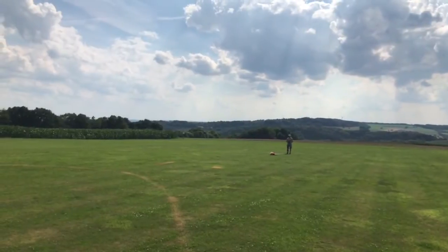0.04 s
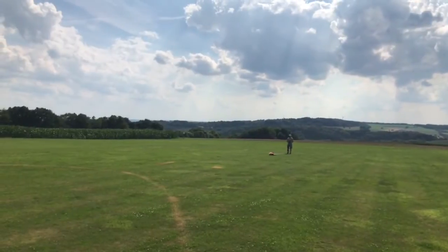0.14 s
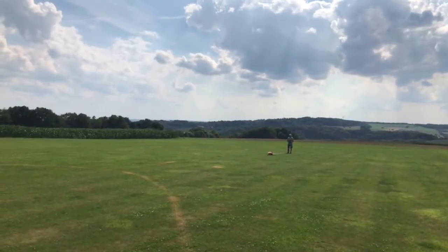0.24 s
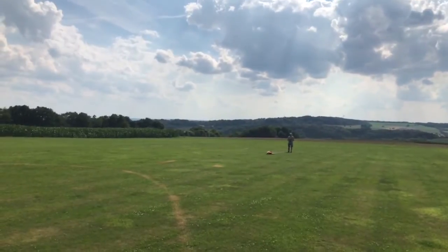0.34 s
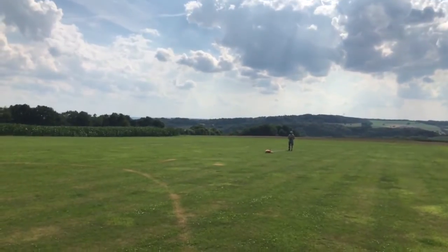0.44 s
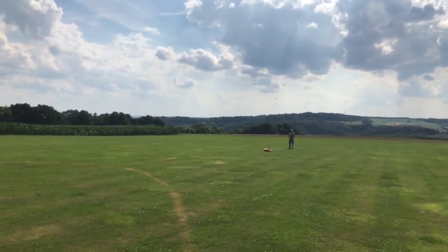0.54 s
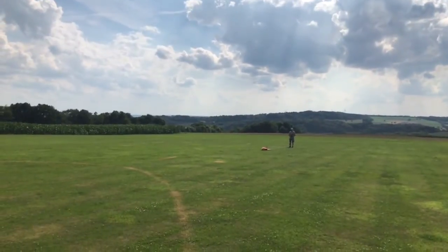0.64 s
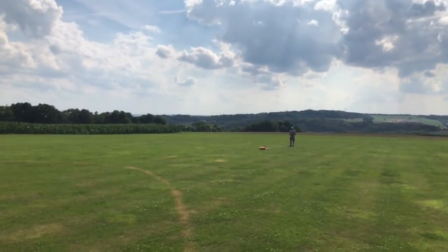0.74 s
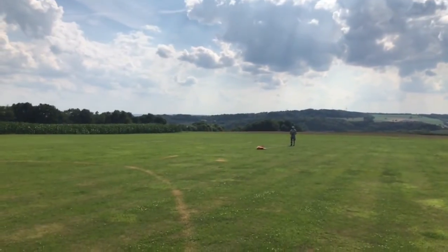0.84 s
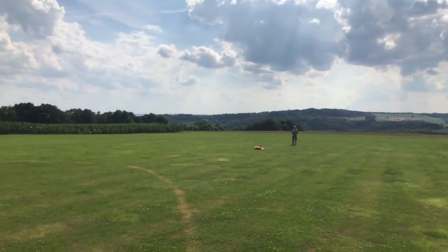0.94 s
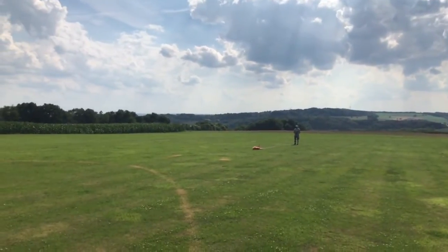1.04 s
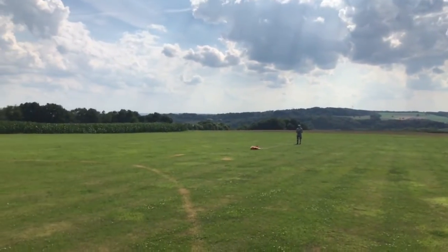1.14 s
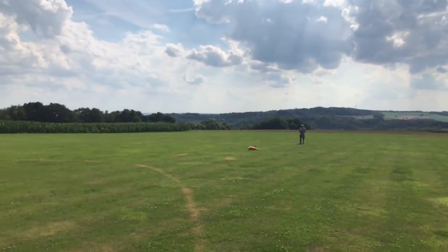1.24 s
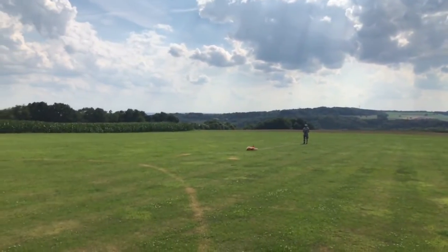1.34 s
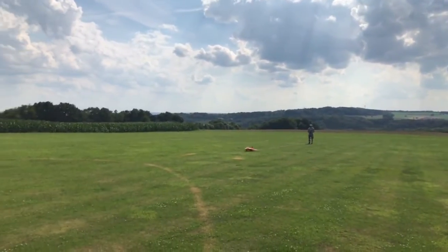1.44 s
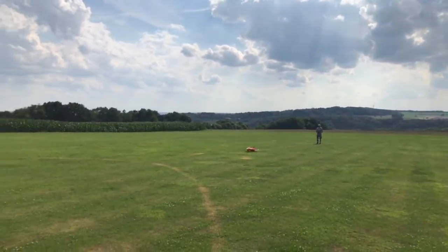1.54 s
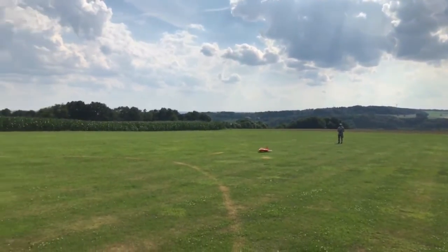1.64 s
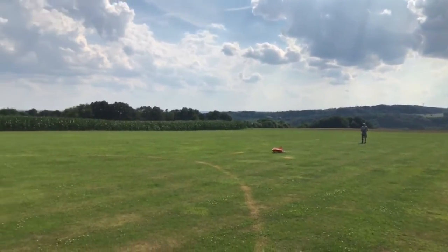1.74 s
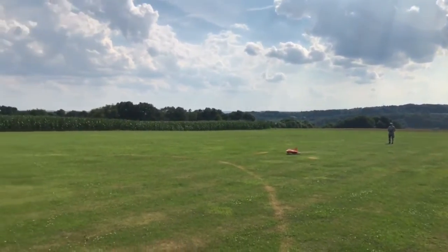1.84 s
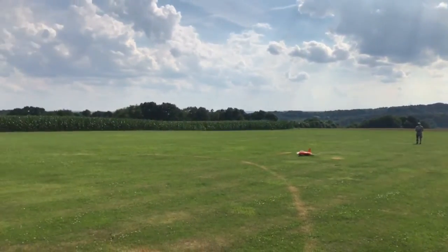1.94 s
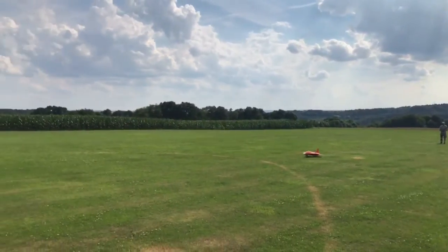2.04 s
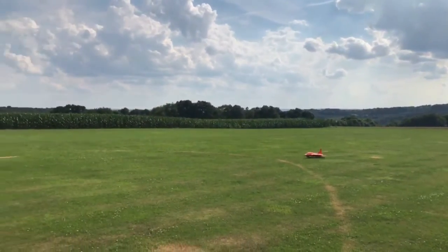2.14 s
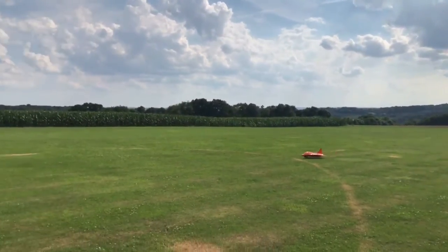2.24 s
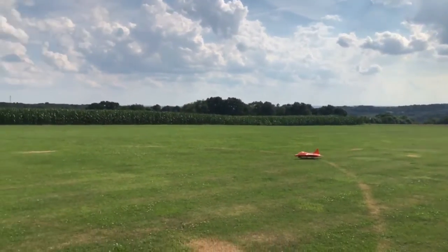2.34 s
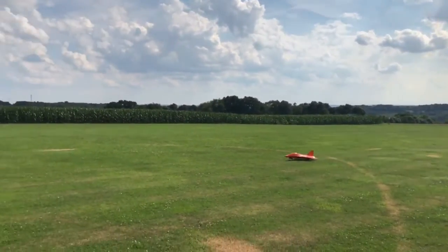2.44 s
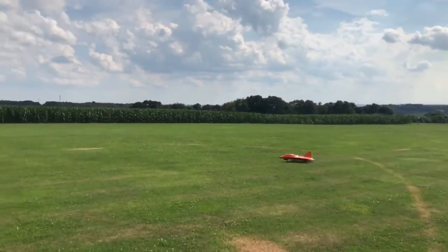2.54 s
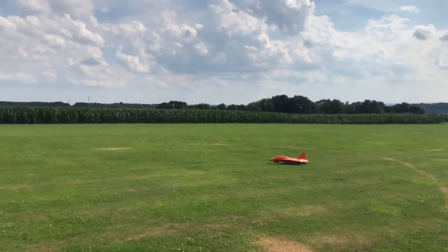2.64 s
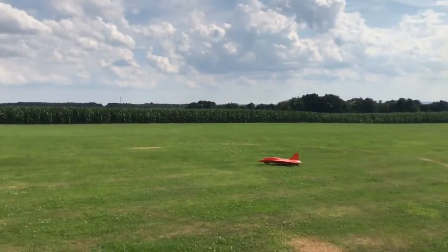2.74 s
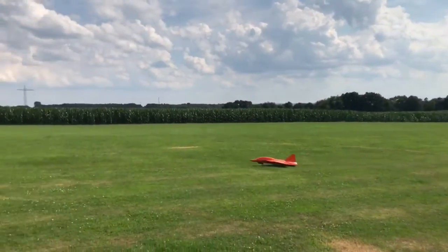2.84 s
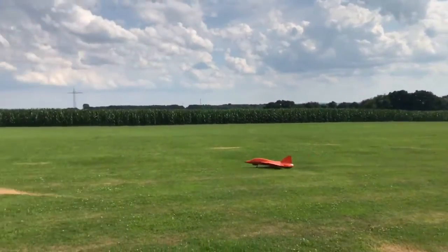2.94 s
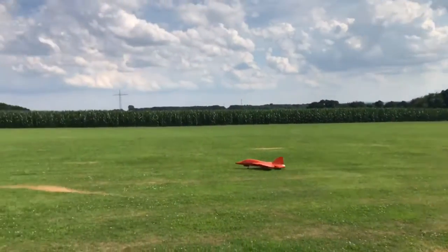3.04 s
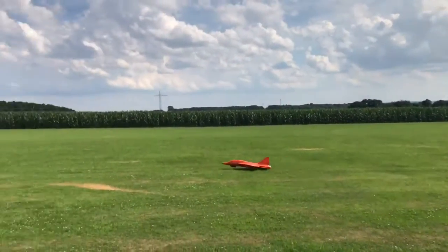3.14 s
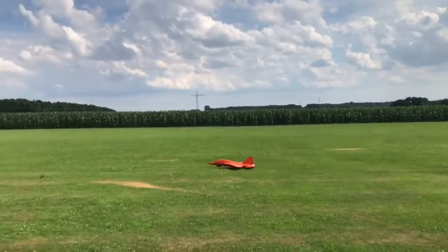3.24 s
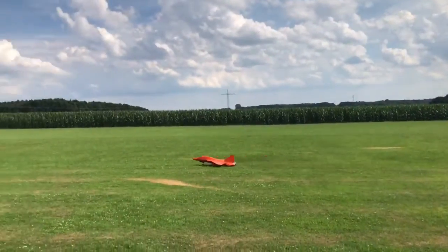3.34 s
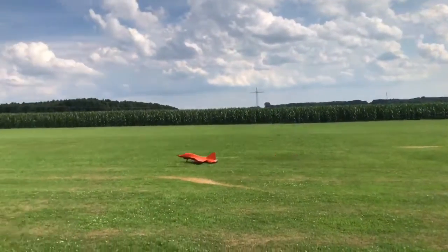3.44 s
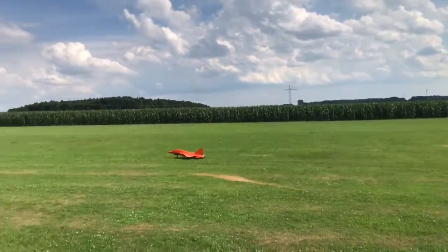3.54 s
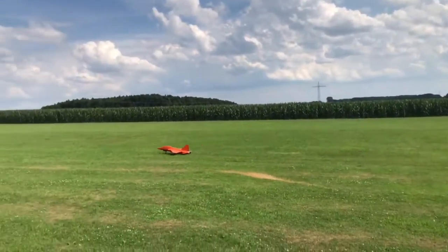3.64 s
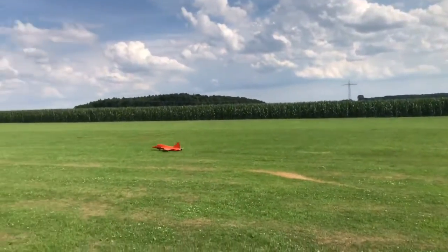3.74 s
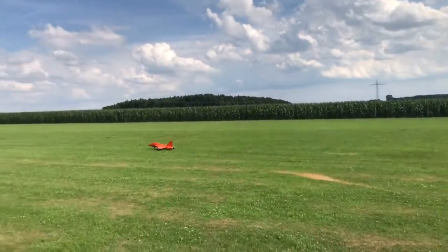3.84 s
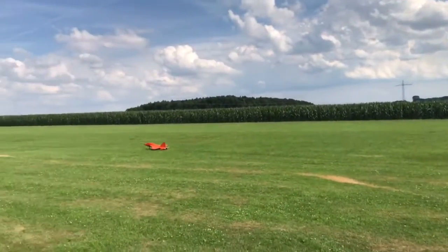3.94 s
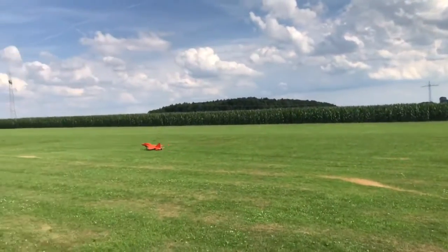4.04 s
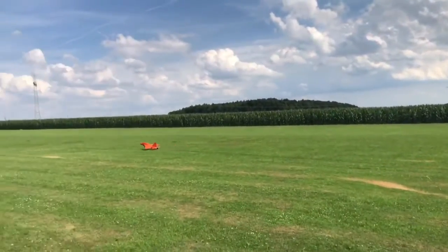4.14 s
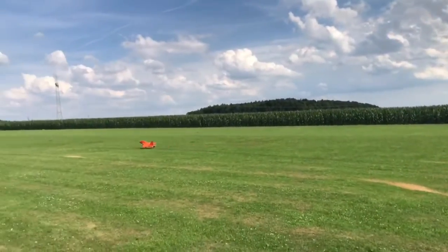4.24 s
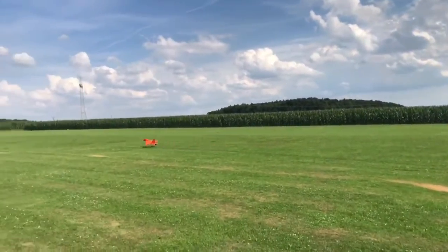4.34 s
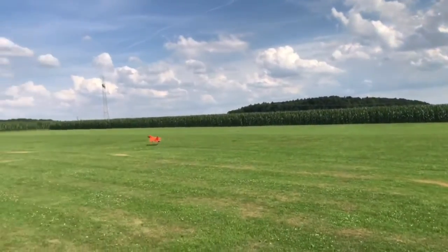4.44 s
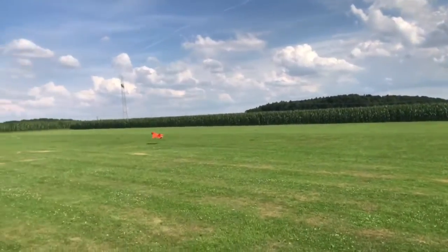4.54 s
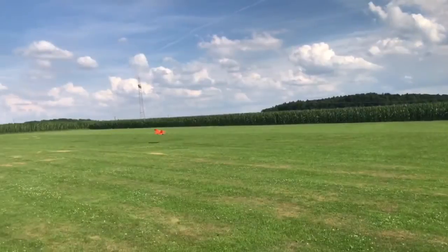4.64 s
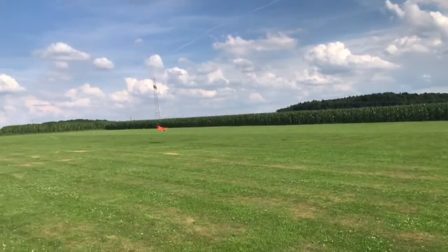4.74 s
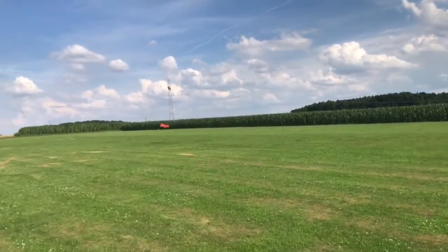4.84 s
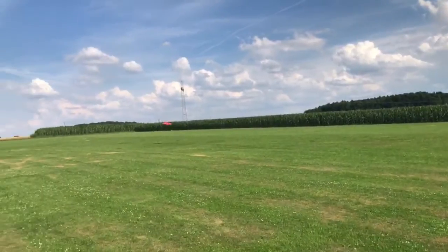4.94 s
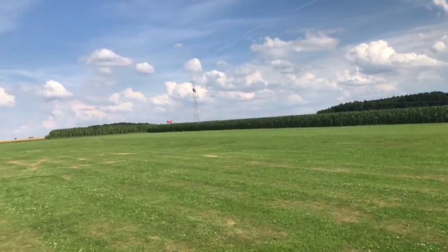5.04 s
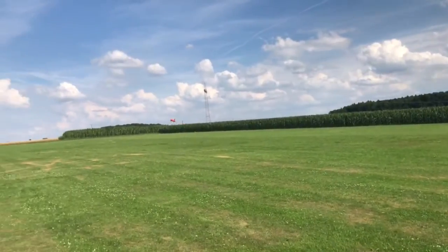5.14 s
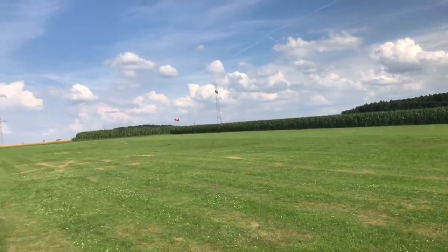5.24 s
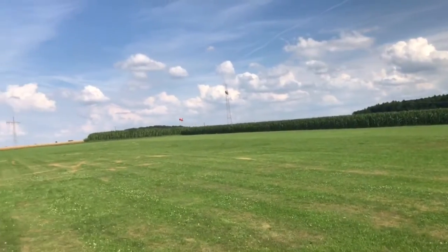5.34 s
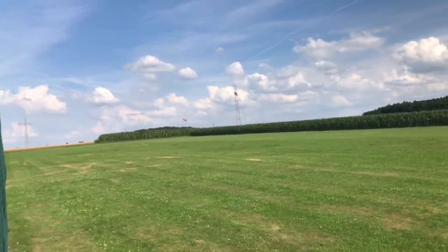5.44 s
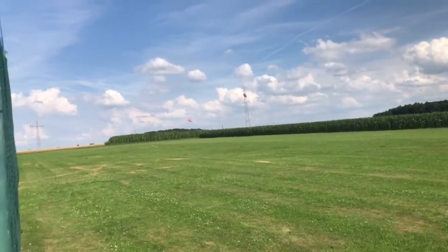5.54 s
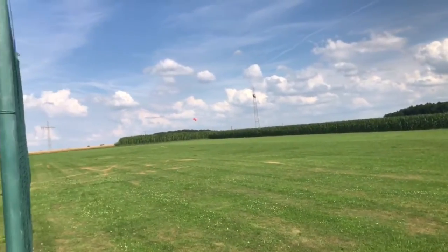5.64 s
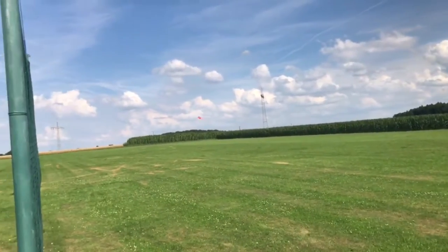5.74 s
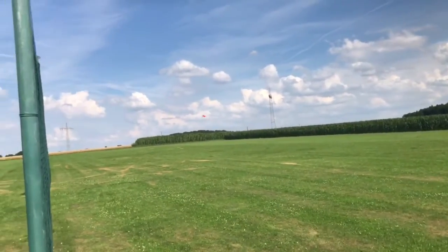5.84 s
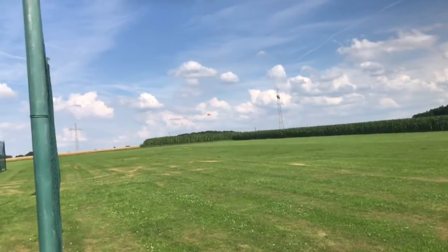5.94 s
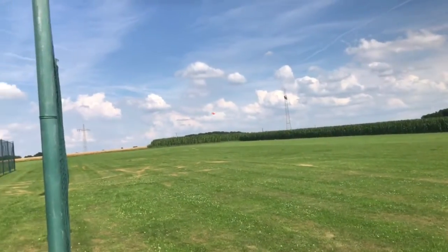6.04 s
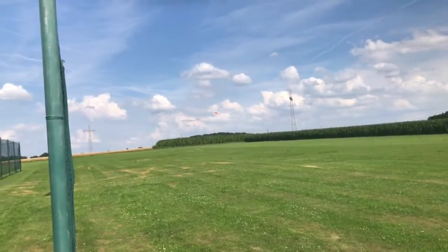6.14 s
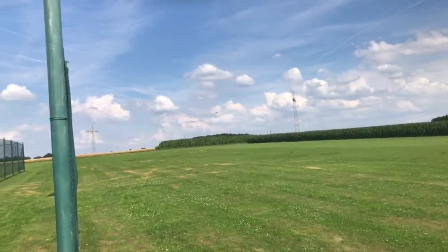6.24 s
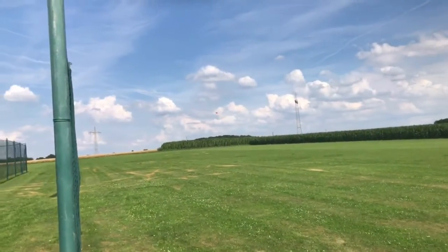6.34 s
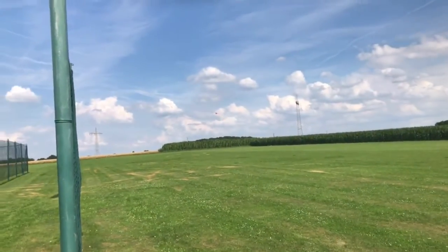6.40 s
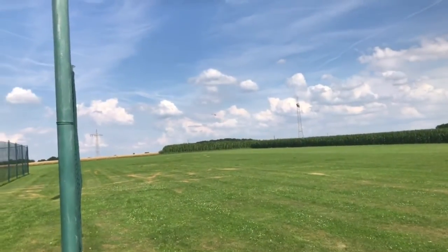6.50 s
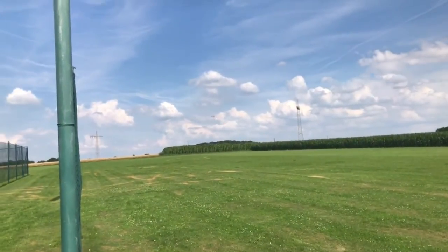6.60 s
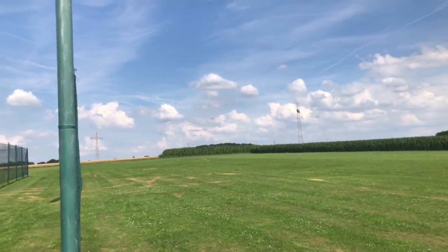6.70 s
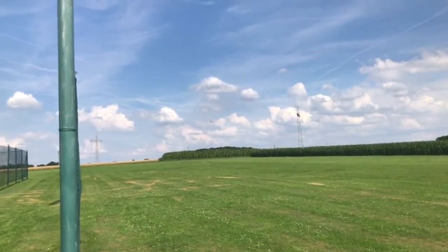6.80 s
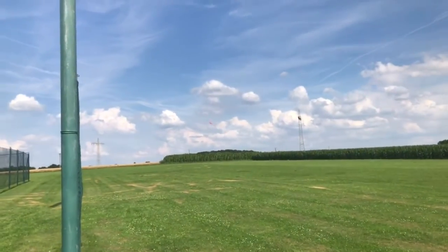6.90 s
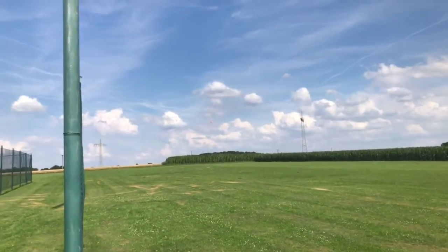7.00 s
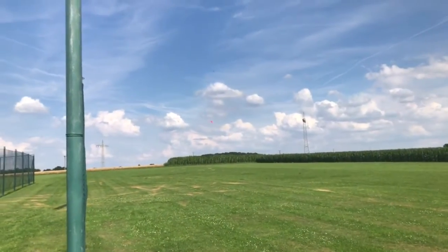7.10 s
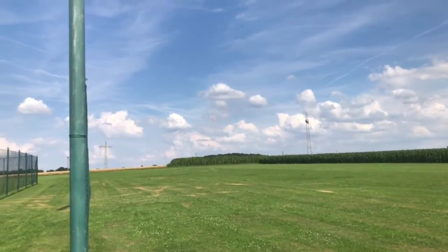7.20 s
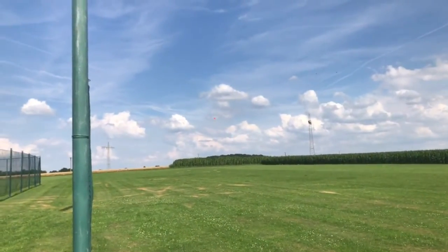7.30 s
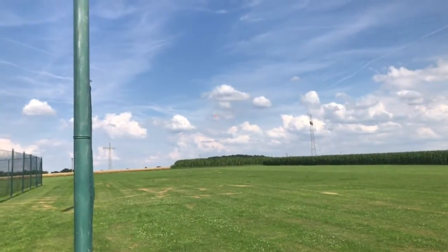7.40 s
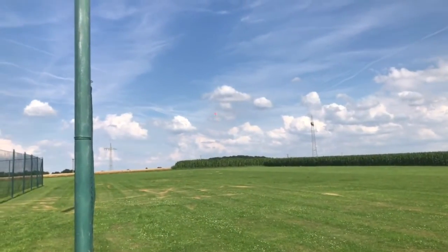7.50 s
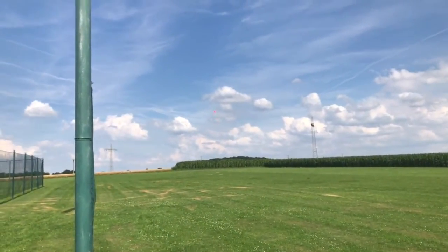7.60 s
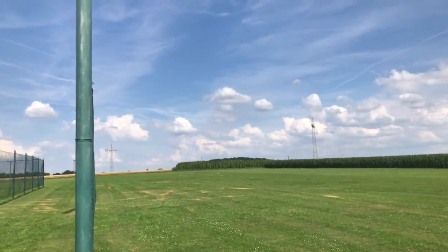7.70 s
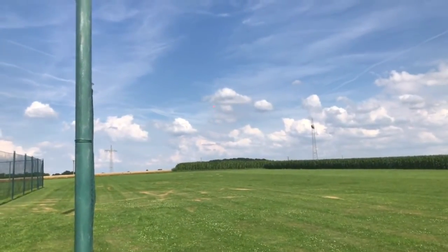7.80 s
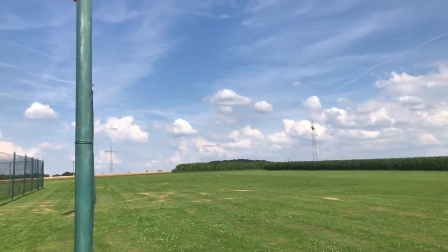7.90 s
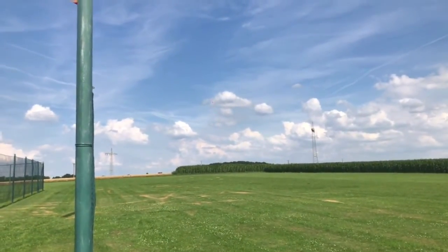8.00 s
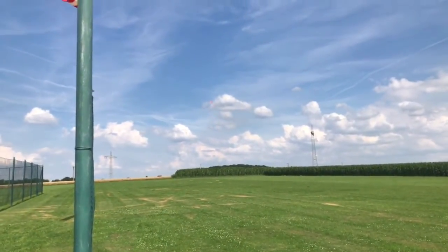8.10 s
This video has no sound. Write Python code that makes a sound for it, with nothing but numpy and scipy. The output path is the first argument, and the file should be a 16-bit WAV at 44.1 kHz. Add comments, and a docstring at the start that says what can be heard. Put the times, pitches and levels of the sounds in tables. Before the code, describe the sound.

In an open grass field, a distant model jet starts as thin hiss and a very high faint whine over low wind. It rushes closer, the whine turning piercing just before it passes, then dropping in pitch as a broad exhaust rush takes over. Heavy gusts thump and flutter against the single microphone during the pass, then ease as the jet climbs and fades.

```python
"""First a thin, distant hiss with a faint high whine over low wind; then a model jet with an electric ducted
fan rolls over grass at full power, passes the microphone and climbs away. The whine is a blade-passing tone
whose pitch falls by Doppler shift; the rush is noise whose colour turns from intake to exhaust, over a low roar.
In the climb a delayed ground echo sweeps a comb through rush and roar. Wind is noise driven by a table of gusts
over a breeze, with single pressure pulses as buffets, all at one microphone."""
import sys
import numpy as np
from scipy import signal
from scipy.fft import rfft, irfft
from scipy.io import wavfile
from scipy.ndimage import uniform_filter1d

SR = 44100
rng = np.random.default_rng(int(sys.argv[2]) if len(sys.argv) > 2 else 0)


def bounce(signal):
    """Save signal as a 16-bit WAV file at the path given by the first command-line argument."""
    frames = np.transpose(np.atleast_2d(signal))
    limited = np.clip(frames, -1, 1)
    pcm = np.round(limited * 32767).astype(np.int16)
    wavfile.write(sys.argv[1], SR, pcm)


N = 359856
TIME = np.arange(N) / SR  # s

# Levels are those at the source tables: small trims and the microphone's response come later.
# Blade tone, greatest as the intake points at the microphone: (time [s], tone level [dB], octave level [dB])
WHINE_LEVEL = [(0, -62, -79), (.6, -56.5, -73), (1.25, -54, -70), (1.53, -43, -55), (1.8, -50, -60),
               (2.22, -26, -41), (2.55, -22.5, -42), (2.8, -35.5, -38), (3.55, -40, -29), (3.9, -36.5, -33),
               (4.45, -45, -45), (4.72, -41, -53), (5.6, -52.5, -52), (6.02, -47, -69), (6.6, -58, -84),
               (7.4, -61, -91), (8.16, -61, -82)]
# Blade-passing frequency, raised on the approach and lowered after the pass: (time [s], pitch [Hz])
BLADE_PITCH = [(0, 7790), (.9, 7808), (1.5, 7831), (2.25, 7851), (2.55, 7820), (2.8, 7758), (3.1, 7646),
               (3.4, 7490), (3.8, 7352), (4.45, 7214), (5.3, 7092), (6, 7008), (7, 6907), (8.16, 6870)]
# Hum of the fan's shaft: (time [s], level [dB])
SHAFT_LEVEL = [(0, -67), (.8, -66), (1.4, -68), (2.1, -59.5), (2.8, -61.5), (4.5, -65), (8.16, -77)]
BLADES = 11
# Scattered share of the blade tone, one value for each aspect 0 to 4
TONE_SCATTER = [0.46, 0.31, 0.44, 0.86, 0.39]
# Side of the jet heard: (time [s], aspect [0 far ahead, 1 intake, 2 flank, 3 exhaust, 4 far behind])
ASPECT_HEARD = [(0, -0.5), (1.1, 1.06), (1.8, 1.5), (2.6, 1), (3.1, 2), (3.6, 2), (4.3, 3), (5, 3.5),
                (5.6, 3.5)]

# Air rushing through the fan: (time [s], level [dB], level of the top hiss [dB])
RUSH_LEVEL = [(0.0, -45.5, -54.0), (0.85, -49.5, -57), (1.45, -35.5, -45.5), (2.15, -29.5, -32),
              (2.65, -27.5, -32.5), (3.3, -32.5, -32.5), (4.2, -35.5, -34.5), (4.75, -33, -34),
              (5.15, -39, -46.5), (5.65, -42, -50.5), (6.5, -51, -62.5), (7.3, -52.5, -71),
              (8.16, -54.5, -68.5)]
# Swells (+) and dips (-) of the rush: (start [s], length [s], change [dB], change of the top hiss [dB])
RUSH_SWELLS = [(0.15, 0.66, -1, 6.5), (0.98, 0.17, 1.5, 4), (1.246, 0.19, 0, 3), (1.45, 0.24, -2, 12),
               (1.652, 0.27, 0, -10), (1.744, 0.3, 5, 10), (2.606, 0.13, 1.5, -3.5), (2.693, 0.3, -1, 2.5),
               (3.393, 0.22, -4.5, -3), (3.867, 0.14, 3.5, 4), (4.085, 0.19, -3.5, -1.5),
               (4.254, 0.38, 6, 5), (4.538, 0.12, 3, -9.5), (4.686, 0.097, 5.5, 2.5),
               (4.84, 0.19, 2.5, 1.5), (5.29, 0.18, -4, -6.5), (5.72, 0.17, -0.5, -11),
               (5.856, 0.55, 6, 0.5), (6.193, 0.11, -1.5, -5), (6.797, 0.27, 4, 8.5)]
# Colour of the rush from far ahead: (frequency [Hz], level [dB])
AHEAD_COLOUR = [(1000, -43), (2000, -19), (2800, -6.5), (3400, -7.5), (4000, -1), (4900, -6.5), (6000, -11),
                (7200, -10), (8400, -6.5), (10000, -8.5), (12300, -7), (14000, -9), (16000, -17)]
# Colour of the rush from the intake side: (frequency [Hz], level [dB])
INTAKE_COLOUR = [(1000, -38), (1750, -19.5), (2200, -23.5), (3150, -9.5), (4000, -10.5), (4700, -4),
                 (5100, -7), (6100, -4), (7200, -10), (8400, -3), (10000, -10), (11400, -6.5),
                 (13600, -11.5), (16000, -9)]
# Colour of the rush from the flank: (frequency [Hz], level [dB])
FLANK_COLOUR = [(1000, -8.5), (1700, -16), (2250, -16), (3200, -6.5), (4400, 1), (5000, -1.5), (5600, -5),
                (6800, 1), (8300, -1), (10000, -3), (11700, 0.5), (13500, -1.5), (16000, -1)]
# Colour of the rush from the exhaust side: (frequency [Hz], level [dB])
EXHAUST_COLOUR = [(1000, -31), (2700, -21), (3400, -8.5), (4150, -0.5), (4600, 0), (5100, -6), (5500, -9.5),
                  (6000, -8.5), (6900, -10.5), (8000, -12.5), (9300, -8.5), (11500, -9.5), (13500, -5),
                  (16000, -6)]
# Colour of the rush from far behind: (frequency [Hz], level [dB])
BEHIND_COLOUR = [(1000, -19), (2200, -4), (2850, -20), (3400, -8.5), (4100, -7), (4600, -3), (5000, -22),
                 (6000, -15), (6800, -5.5), (8000, -10.5), (9800, -14), (10800, -18), (14000, -8),
                 (16000, -30)]
# Resonance of the intake duct, heard from in front: (time [s], centre [Hz], lift [dB])
DUCT_RESONANCE = [(0, 5360, 13), (.7, 5430, 2), (1.15, 5200, -1), (1.5, 5230, 13), (2, 5480, 10.5),
                  (2.5, 5420, 11.5), (2.85, 5600, 7), (3.3, 5360, 6)]
# Resonance of the tailpipe: (time [s], centre [Hz], lift [dB])
TAILPIPE_RESONANCE = [(0, 4500, 4), (.8, 4480, -2.5), (1.15, 4170, 12), (1.3, 4100, -1), (1.47, 4170, 13),
                      (1.75, 4600, -2.5), (3.3, 4600, 1), (3.7, 4630, 10), (4.5, 4570, 4), (4.7, 4420, 8),
                      (4.82, 4540, 0), (4.97, 4660, 4), (5.3, 4740, 5), (6.4, 4400, 1), (7, 4540, 6.5),
                      (8.16, 4360, 0.5)]
# A hollow slides once down the distant hiss:
# (middle [s], half length [s], centre [Hz], slide [Hz/s], width [Hz], depth [dB])
HISS_HOLLOW = (.69, .17, 3650, -3800, 520, -9)
# Handover from the body of the rush to its top hiss: (frequency [Hz], share of top hiss)
HISS_SHARE = [(5000, 0.048), (6200, 0.64), (8500, 0.96)]
# The rush grows duller as the jet draws away; the loss is given at DULLING_HZ
AWAY_S, DULLING_DB_PER_S, DULLING_HZ = 4.6, 4, 12000

# Low roar of the exhaust stream: (time [s], level [dB])
ROAR_LEVEL = [(0, -56.5), (.9, -56), (1.4, -55), (1.9, -54.5), (2.5, -46.5), (3.4, -46), (4.4, -51.5),
              (4.9, -40), (5.3, -44), (5.8, -47), (6.3, -51), (7, -53.5), (7.6, -55), (8.16, -54)]
# Colour of the roar: (frequency [Hz], level [dB])
ROAR_SPECTRUM = [(100, -9), (300, -31), (480, -7), (680, 2.5), (1100, 3), (1500, -1), (1950, -1),
                 (2200, -5), (2700, -10), (4000, -19.5)]

# Lag of the ground echo, growing with the jet's height: (time [s], lag [ms])
ECHO_LAG = [(4.2, .1), (4.6, .15), (4.9, .31), (5.4, .72), (5.7, .73), (6.6, 1.06), (7.6, 1.34),
            (8.16, 1.586)]
# Strength of the ground echo, greatest just after lift-off: (time [s], share of the direct sound)
ECHO_STRENGTH = [(4.35, 0.055), (4.85, 0.75), (5.12, .85), (5.7, 0.53), (8.16, 0.36)]
# Dulling of the echo by soft ground: (frequency [Hz], level [dB])
GRASS_COLOUR = [(4500, -4.5), (7000, -20), (16000, -26)]

# Breeze between gusts: (time [s], rumble level [dB], small-eddy level [dB])
BREEZE = [(0, -47, -61), (1, -50.5, -57.5), (1.25, -57, -61.5), (2, -55.5, -61.5), (2.4, -51, -56),
          (3.1, -35.5, -46.5), (3.6, -26.5, -27.5), (4.25, -31, -50), (4.9, -47.5, -60),
          (5.9, -45.5, -58.5), (6.4, -52.5, -67), (7.4, -51, -62.5), (7.78, -56.5, -66), (8.16, -40, -62)]
# Gusts at the microphone: (start [s], length [s], rumble level [dB], small-eddy level [dB])
GUST_EVENTS = [(0.008, 0.023, -37.5, -63), (0.496, 0.031, -44, -64), (0.654, 0.028, -40, -69),
               (0.992, 0.089, -44.5, -73), (1.534, 0.092, -46, -77), (2.206, 0.063, -42, -72),
               (2.502, 0.039, -36.5, -37.5), (2.553, 0.039, -39, -38), (2.635, 0.15, -36.5, -60),
               (2.76, 0.035, -32, -26.5), (2.841, 0.046, -32, -38.5), (2.932, 0.062, -32.5, -30),
               (3.136, 0.052, -24, -27.5), (3.232, 0.059, -20.5, -28.5), (3.309, 0.059, -15, -19.5),
               (3.397, 0.068, -15.5, -25), (3.475, 0.048, -32, -17), (3.516, 0.068, -17.5, -18.5),
               (3.677, 0.18, -19.5, -28.5), (3.787, 0.071, -12.5, -18), (3.84, 0.091, -28, -19),
               (3.91, 0.085, -31, -25.5), (4.021, 0.092, -22.5, -22), (4.108, 0.045, -23, -26.5),
               (4.159, 0.094, -27, -28), (4.296, 0.04, -34, -32.5), (4.408, 0.059, -24, -47),
               (4.499, 0.069, -24, -37.5), (4.602, 0.037, -23.5, -30), (4.669, 0.063, -21.5, -26),
               (4.773, 0.057, -29.5, -39), (5.22, 0.1, -39.5, -53), (5.513, 0.023, -23, -39.5),
               (5.547, 0.038, -28.5, -41.5), (6.018, 0.053, -40.5, -48), (6.081, 0.044, -34, -44.5),
               (6.596, 0.04, -40.5, -51.5), (6.67, 0.12, -42, -64), (6.884, 0.052, -47.5, -53.5),
               (7.057, 0.04, -41.5, -53), (7.157, 0.1, -42, -74), (7.33, 0.063, -46, -60),
               (7.538, 0.088, -40.5, -50), (8.005, 0.047, -39, -47), (8.085, 0.049, -33, -50)]
GUST_SQUARENESS = 3.3  # exponent: sets in fast, holds and drops; 2 would be a bell
# Colour of the large eddies: (frequency [Hz], level [dB])
RUMBLE_SPECTRUM = [(10, -50), (25, -26), (44, -2.5), (66, 4.5), (90, 0), (130, -5), (185, -15), (290, -30),
                   (600, -74)]
# Colour of the small eddies: (frequency [Hz], level [dB])
EDDY_SPECTRUM = [(80, -38), (150, 4.5), (220, 0.5), (320, -2), (480, -11.5), (750, -14.5), (1500, -99)]
# Colour of the flutter added by strong wind: (frequency [Hz], level [dB])
FLUTTER_SPECTRUM = [(250, -12), (420, 5), (620, 2), (1000, -1), (1400, -10), (2000, -24), (2800, -26),
                    (5000, -70)]
# Single hard buffets: (time [s], peak level [dB])
BUFFET_EVENTS = [(2.771, -20.5), (3.153, -21), (3.23, -11.5), (3.278, -15.5), (3.346, -10.5), (3.405, -15),
                 (3.444, -12.5), (3.486, -8.5), (3.532, 1.5), (3.551, -7), (3.829, -1), (3.862, -6.5),
                 (3.902, -7), (4.16, -14.5), (4.194, -12.5), (4.507, -19.5), (4.547, -18), (4.612, -14.5),
                 (4.679, -11), (4.688, -10.5), (4.786, -19.5), (5.519, -17.5), (5.571, -26.5),
                 (6.111, -23.5), (8.018, -27), (8.099, -27)]
# Colour of the buffets: (frequency [Hz], level [dB])
BUFFET_COLOUR = [(40, -16), (120, 0.0), (1500, -2), (2400, -13), (3500, -24), (6000, -50)]
# Fixed trim of all wind, below 40 Hz and above 2.5 kHz: (frequency [Hz], level [dB])
WIND_TRIM = [(20, -20), (42, -0.5), (62, 0.0), (2200, 0.5), (3200, -13), (6000, -40)]

# Response of the microphone: (frequency [Hz], level [dB])
PORT_RESPONSE = [(10, -36), (28, 15), (52, 1), (9600, -1), (10400, -5.5), (11000, -1), (12300, 0.5),
                 (13200, -4.5), (16000, -1.5)]
EDGE_HZ = 15780


def whine(jitter_hz=3, skirt_db=-21, octave_lift_db=-1.0, fading_db=-0.5):
    """Blade passing: the fan radiates a tone and its octave at multiples of the shaft's rate."""
    hz, = curves(BLADE_PITCH)
    blade_db, octave_db = curves(WHINE_LEVEL)
    shaft_db, = curves(SHAFT_LEVEL)
    aspect, = curves(ASPECT_HEARD)
    # the tone is steadiest in the beam of the intake
    scatter = np.interp(aspect, np.arange(5), TONE_SCATTER)

    smooth_hz = uniform_filter1d(hz, size=5000)
    angle = 2 * np.pi * np.cumsum(smooth_hz + jitter_hz * wander(24.0)) / SR
    shaft = evened(np.sin(angle / BLADES + 0.65 * wander(3.8)))
    fading = gain_of(fading_db * scatter * wander(4))
    blade = fading * twinkling(angle, scatter, rate_hz=14.5)
    octave = twinkling(2 * angle, 1.3 * scatter, rate_hz=37)

    tones = gain_of(shaft_db) * shaft
    tones += gain_of(blade_db) * blade
    tones += gain_of(octave_db + octave_lift_db) * octave
    # fast amplitude modulation spreads a skirt around each tone
    return tones * (1 + gain_of(skirt_db) * wander(140))


def twinkling(angle, scatter, rate_hz):
    """Interference: a tone and its share scattered by moving air add and cancel by turns."""
    scattered = wander(rate_hz) * np.sin(angle) + wander(rate_hz) * np.cos(angle)
    return steadied(np.sin(angle) + scatter * scattered, size=7000)


def rush(patch_db=1.5, twinkle_db=1.35, level_db=0.57, hiss_db=1.45):
    """Directivity: broad fan noise changes colour as the jet turns from nose to tail."""
    hz, t, spectrum = signal.stft(rng.standard_normal(N), SR, nperseg=512, noverlap=384)
    colour = rush_colour(hz, t)
    power = gain_of(colour) ** 2 / len(hz)
    # band levels of the bare colour, so that the level table can replace them
    body = 10 * np.log10(power[(hz > 3000) & (hz < 7000)].sum(0))
    top = 10 * np.log10(power[(hz > 8500) & (hz < 14000)].sum(0))
    body_db, top_db = rush_levels(t)
    treble = read(HISS_SHARE, hz)[:, None]
    db = colour + (1 - treble) * (body_db - body + level_db)
    db = db + treble * (top_db - top + hiss_db)

    # random patches of level dapple the rush; a separate twinkle grows with frequency
    chance = uniform_filter1d(rng.standard_normal(spectrum.shape), size=8, axis=0)
    patches = evened(uniform_filter1d(chance, size=24, axis=1))
    twinkle = np.interp(t, TIME, wander(22)) * hz[:, None] / 10000
    db = db + patch_db * patches + twinkle_db * twinkle
    return signal.istft(spectrum * gain_of(db), SR, nperseg=512, noverlap=384)[1][:N]


def rush_colour(hz, t, intake_width_hz=270, tailpipe_width_hz=250, dulling_power=4):
    """Directivity and resonance: sides blended in dB, two duct peaks, a hollow and a late dulling."""
    aspect, = curves(ASPECT_HEARD, t)
    sides = [AHEAD_COLOUR, INTAKE_COLOUR, FLANK_COLOUR, EXHAUST_COLOUR, BEHIND_COLOUR]
    distance = abs(np.clip(aspect, 0, len(sides) - 1) - np.arange(len(sides))[:, None])
    share = np.maximum(1 - distance, 0)
    db = np.transpose([read(side, hz) for side in sides]) @ share

    f = hz[:, None]
    for table, width_hz in (DUCT_RESONANCE, intake_width_hz), (TAILPIPE_RESONANCE, tailpipe_width_hz):
        centre_hz, lift_db = curves(table, t)
        db = db + lift_db * np.exp(-((f - centre_hz) / width_hz) ** 2)

    middle, half, centre_hz, slide, width_hz, depth_db = HISS_HOLLOW
    across = (f - centre_hz - slide * (t - middle)) / width_hz
    hollow = np.exp(-across ** 2 - ((t - middle) / half) ** 4)
    dulling = DULLING_DB_PER_S * np.maximum(t - AWAY_S, 0) * (f / DULLING_HZ) ** dulling_power
    return db + depth_db * hollow - dulling


def rush_levels(t):
    """Superposition of levels: the slow pass of body and top hiss, plus a smooth arch in dB for each swell."""
    levels = np.array(curves(RUSH_LEVEL, t))
    for start, length, *change_db in RUSH_SWELLS:
        arch = np.sin(np.pi * np.clip((t - start) / length, 0, 1)) ** 2
        levels += np.outer(change_db, arch)
    return levels


def roar(waver_db=1.38):
    """Turbulent mixing: the exhaust stream radiates low, broad noise of slowly wavering level."""
    db, = curves(ROAR_LEVEL)
    return gain_of(db + waver_db * wander(5.5)) * noise(ROAR_SPECTRUM)


def over_ground(x, soft_hz=600):
    """Comb filtering: a lagging echo interferes; soft ground flips its phase above soft_hz and dulls it."""
    lag_ms, = curves(ECHO_LAG)
    strength, = curves(ECHO_STRENGTH)
    ratio = 1j * np.fft.rfftfreq(N, 1 / SR) / soft_hz
    flipped = irfft(rfft(x) * (1 - ratio) / (1 + ratio), N)
    bounced = coloured(flipped, GRASS_COLOUR)
    echo = np.interp(TIME - lag_ms / 1000, TIME, bounced)
    return (x + strength * echo) / np.sqrt(1 + .5 * strength ** 2)


def wind(burst_db=4.5, eddy_lift_db=0.5, flutter_db=-31, strong_db=-23, growth=2.17):
    """Turbulence: large eddies rumble; small ones burst and reach higher the harder it blows."""
    large_db, small_db = wind_levels()
    bursts = gain_of(burst_db * np.clip(wander(53), -2, 1.6))
    rumble = gain_of(large_db) * steadied(noise(RUMBLE_SPECTRUM), size=1500)
    eddies = gain_of(small_db + eddy_lift_db) * steadied(noise(EDDY_SPECTRUM) * bursts, size=1800)
    # flutter stands at flutter_db when the small eddies stand at strong_db
    high_db = flutter_db + growth * (small_db - strong_db)
    flutter = gain_of(high_db) * steadied(noise(FLUTTER_SPECTRUM) * bursts, size=1800)
    return rumble + eddies + flutter + buffets()


def wind_levels(puff_db=1.5, puff_hz=7):
    """Addition of powers: gusts add to a restless breeze, for the rumble and the small eddies."""
    breeze_db = np.array(curves(BREEZE))
    power = gain_of(breeze_db + puff_db * wander(puff_hz)) ** 2
    for start, length, *peak_db in GUST_EVENTS:
        from_middle = abs(2 * (TIME - start) / length - 1)
        near = from_middle < 2
        shape = np.exp(-from_middle[near] ** GUST_SQUARENESS)
        power[:, near] += np.outer(gain_of(peak_db) ** 2, shape)
    return 10 * np.log10(power)


def buffets(scale_ms=0.29, hard_db=-10, slowing=0.93, lift_db=1):
    """Eddy passage: suction at the port flips to pressure; by table level, harder hits are faster."""
    out = np.zeros(N)
    for s, db in BUFFET_EVENTS:
        width_ms = scale_ms * gain_of(slowing * (hard_db - db))
        u = (TIME - s) * 1000 / width_ms
        pulse = 2 * u / (1 + u ** 2) * np.exp(-(u / 7) ** 2)
        out += gain_of(db + lift_db) * pulse
    return coloured(out, BUFFET_COLOUR)


def rounded(gusts, ceiling_db=-2):
    """Saturation: soft limiting rounds the strongest gusts; a fixed colour then trims all wind."""
    ceiling = gain_of(ceiling_db)
    return coloured(ceiling * np.tanh(gusts / ceiling), WIND_TRIM)


def gain_of(db):
    """Decibel law: 20 dB is a tenfold amplitude."""
    return 10 ** (np.asarray(db) / 20)


def evened(x):
    """Normalization: scales to rms 1."""
    return x / np.sqrt(np.mean(x ** 2) + 1e-20)


def curves(rows, t=TIME):
    """Linear interpolation: the columns of a table at the times t."""
    s, *columns = np.transpose(rows)
    return [np.interp(t, s, column) for column in columns]


def read(points, hz):
    """Logarithmic interpolation: reads a table's values on a log-frequency axis."""
    f, values = np.transpose(points)
    return np.interp(np.log(hz + 1), np.log(f + 1), values)


def coloured(x, points):
    """Linear filtering: multiplies the spectrum of x by a table in dB."""
    gain = gain_of(read(points, np.fft.rfftfreq(N, 1 / SR)))
    return irfft(rfft(x) * gain, N)


def noise(points):
    """Stationary random noise: a given colour at rms 1."""
    return evened(coloured(rng.standard_normal(N), points))


def wander(rate_hz):
    """Low-pass random process: smooth chance up to about rate_hz, rms 1."""
    hz = np.fft.rfftfreq(N, 1 / SR)
    return evened(irfft(rfft(rng.standard_normal(N)) / (1 + (hz / rate_hz) ** 4), N))


def steadied(x, size):
    """Local normalization: holds rms near 1 over stretches of size samples and keeps faster detail."""
    power = uniform_filter1d(uniform_filter1d(x ** 2, size), size)
    return x / np.sqrt(abs(power) + 1e-12)


def scene():
    """Superposition: the jet over the field and wind at one microphone, alike in both channels."""
    jet = over_ground(rush() + roar()) + whine()
    return np.tile(jet + rounded(wind()), (2, 1))


def record(dry):
    """Transducer response: the colour of the microphone port, then the band limit."""
    heard = np.array([coloured(channel, PORT_RESPONSE) for channel in dry])
    edge = signal.firwin(1023, EDGE_HZ, window=("kaiser", 9), fs=SR)
    return signal.oaconvolve(heard, edge[None], "same", axes=1)


dry = scene()
out = record(dry)
bounce(out)
```